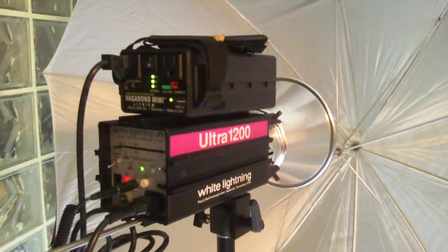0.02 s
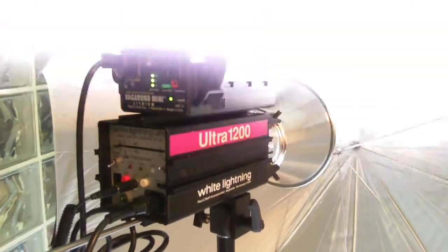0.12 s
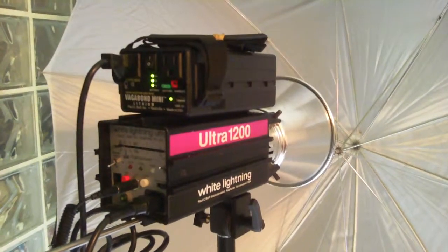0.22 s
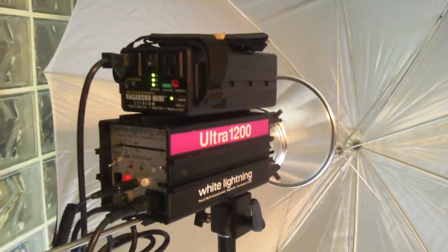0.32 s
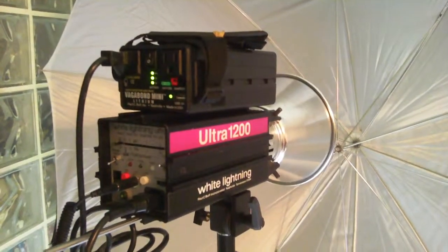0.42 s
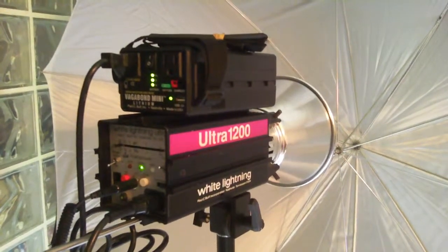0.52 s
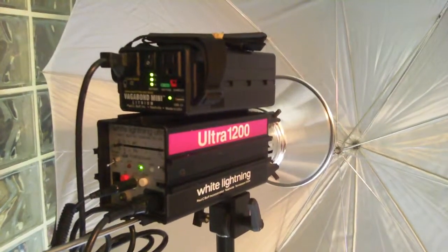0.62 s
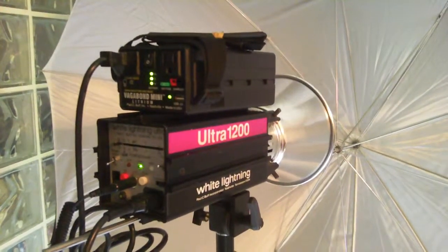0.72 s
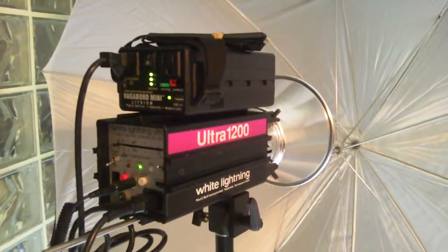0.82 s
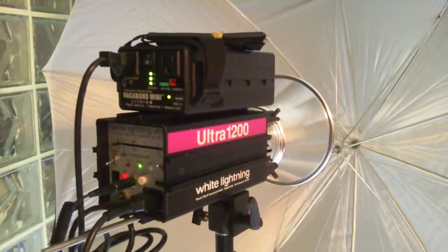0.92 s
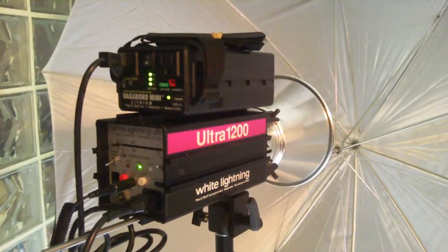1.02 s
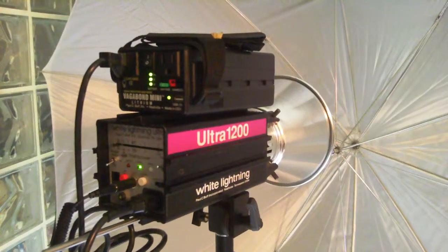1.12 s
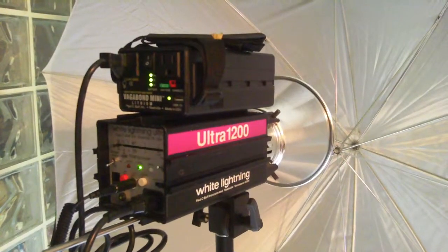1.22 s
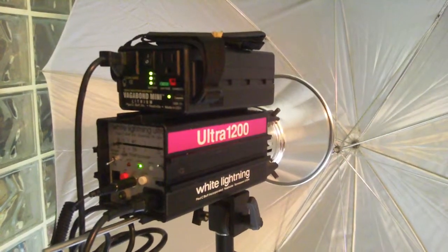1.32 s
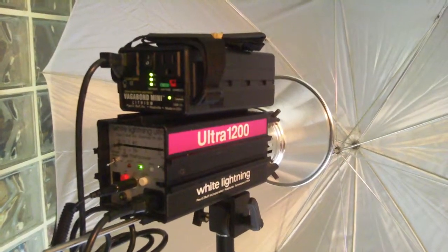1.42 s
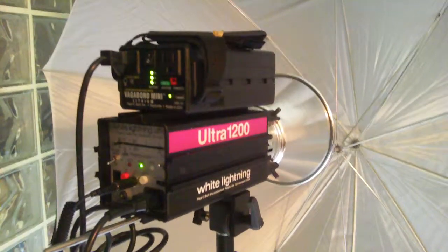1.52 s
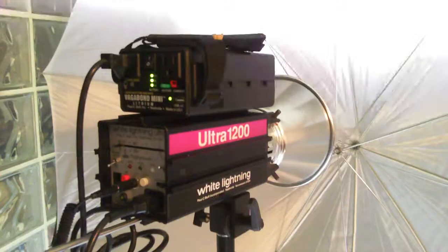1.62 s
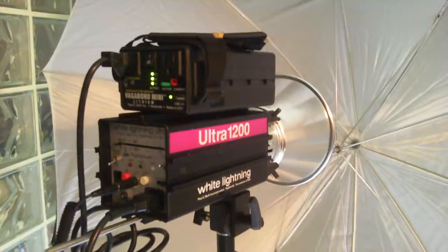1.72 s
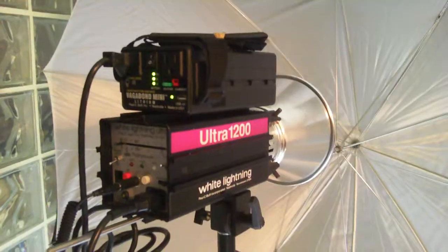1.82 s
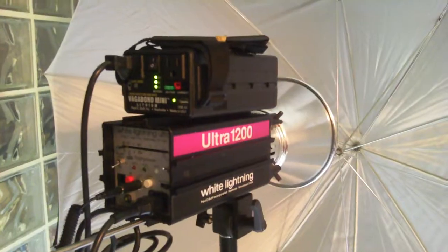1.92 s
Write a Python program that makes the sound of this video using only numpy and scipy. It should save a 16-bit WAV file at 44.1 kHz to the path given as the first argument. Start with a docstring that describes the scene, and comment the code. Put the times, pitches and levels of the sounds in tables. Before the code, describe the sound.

A studio flash fires twice with sharp, high clicks in a quiet room.

```python
"""In a small, quiet studio room, a flash head fires twice, close by.
Each firing is a light trigger tick, the sharp crack of the discharge and a quick rebound,
which make the flash tube and its metal housing shiver and ring.
A faint scuffing tick comes between the firings, and a soft tap follows the second.
The walls add a short echo; room air and mains hum lie beneath it all."""
import sys
import numpy as np
from scipy import signal
from scipy.fft import rfft, irfft
from scipy.io import wavfile
from scipy.ndimage import uniform_filter1d

SR = 44100
rng = np.random.default_rng(int(sys.argv[2]) if len(sys.argv) > 2 else 0)


def put_to_file(sound):
    """Save the sound as 16-bit audio at rate SR, in the file named by the first command-line argument."""
    columns = np.atleast_2d(sound).T  # one column per channel
    safe = np.clip(columns, -1, 1)
    whole_steps = np.round(safe * 32767)
    wavfile.write(sys.argv[1], SR, whole_steps.astype(np.int16))


N = 88200  # two seconds

# A "colour" says how strong the low and high frequencies are compared with each other.
# colour of the room air (frequency [Hz], level [dB])
AIR_COLOUR = [(15, -47), (25, -20.5), (54, -7), (81, -11.5), (112, -4), (146, -12.5), (186, -2),
              (373, -2.5), (543, -4.5), (691, -5.5), (1120, -8), (1280, -11), (1630, -11.5), (7680, -18.5),
              (15000, -17)]
# colour of the echo from the walls (frequency [Hz], level [dB])
ECHO_COLOUR = [(500, -1), (2000, 9.5), (6000, 3), (10000, -4), (15000, -6)]
# the three contacts of the scuff (time [s], level [dB])
SCUFF_CONTACTS = [(1.046, -51), (1.057, -49.5), (1.07, -52)]
# colour of the scuff (frequency [Hz], level [dB])
SCUFF_COLOUR = [(2500, -36), (4700, -7), (5700, -8), (6350, 3.5), (6900, 1.5), (7500, -10), (8300, -2),
                (10000, -9.5), (13000, -20)]
# the tap and its small bounces (time [s], level [dB])
TAP_CONTACTS = [(1.867, -46.5), (1.873, -51), (1.8763, -54), (1.8855, -57)]
# colour of the tap (frequency [Hz], level [dB])
TAP_COLOUR = [(1200, -37), (1900, -12), (2450, 0), (2900, -8), (3500, -19), (4400, -24), (5500, -10),
              (6300, -19), (12000, -34)]
# ringing tones of the tube and housing (frequency [Hz], level [dB], time to fade by 60 dB [s])
RING_TONES = [(967, -48.5, 0.044), (1125, -56, 0.2), (2130, -51, 0.14), (4276, -48.5, 0.07),
              (6700, -41.5, 0.076), (7210, -40.5, 0.093), (8360, -48, 0.15), (8545, -47, 0.09),
              (9238, -21.5, 0.073), (10170, -31, 0.068), (10180, -34, 0.11), (10950, -29.5, 0.068),
              (11540, -39, 0.067), (13060, -31, 0.095)]
# colour of the shivering housing (frequency [Hz], level [dB])
SHIVER_COLOUR = [(250, -48), (600, -26), (1100, -16.5), (2200, -16), (3600, -21.5), (5200, -18), (7000, -5),
                 (8200, -11), (10200, -4), (11200, 0), (12400, 0), (13300, -2), (14100, 2), (15200, -13.5)]
# colour of the trigger tick (frequency [Hz], level [dB])
TRIGGER_COLOUR = [(600, -45), (1600, -27), (2200, -22.5), (3000, -27), (6000, -19), (8200, -27),
                  (9300, -16), (10900, 2.5), (12400, 4), (13300, -11), (15000, -10)]
# colour of the crack and its rebound (frequency [Hz], level [dB])
CRACK_COLOUR = [(250, -66), (800, -52), (1500, -27), (2200, -30), (2900, -20.5), (3650, -28), (4350, -17.5),
                (5100, -28.5), (6100, -15.5), (8200, -18.5), (9500, -4), (10700, -1), (12300, -2.5),
                (13300, 7.5), (14100, -4), (15200, -15)]
# the two firings (time [s], level [dB])
FIRINGS = [(0.2034, -1.2), (1.6961, 0)]

CRACK_DELAY_S, REBOUND_DELAY_S = 0.0026, 0.0043  # both counted from the trigger tick


def gain(db):
    """Turn decibels into a number to multiply a sound by."""
    return 10 ** (np.asarray(db) / 20)


def colour(sound, points):
    """Give a sound a colour; plain white noise would keep its overall power."""
    size = 4096
    hz, db = np.array(points, float).T
    freqs = np.maximum(np.fft.rfftfreq(size, 1 / SR), 1)
    curve = gain(np.interp(np.log(freqs), np.log(hz), db))
    curve /= np.sqrt(np.mean(curve ** 2))
    # build the filter so that nothing sounds before the hit that causes it
    cepstrum = irfft(np.log(curve))
    cepstrum[1:size // 2] *= 2
    cepstrum[size // 2 + 1:] = 0
    click_response = irfft(np.exp(rfft(cepstrum)))
    return signal.fftconvolve(sound, click_response)[:N]


def strike(start, rise_s, fade_s):
    """The loudness shape of a hit: a quick rise, then a fall of 60 dB every fade_s seconds."""
    age = np.maximum(np.arange(N) / SR - start, 0)
    return (1 - np.exp(-age / rise_s)) * np.exp(-np.log(1000) * age / fade_s)


def grit():
    """Noise made of tiny equal pulses, each pointing up or down at random."""
    return np.sign(rng.standard_normal(N))


def snap(start, fade_s):
    """A very short burst that holds every frequency about equally."""
    shape = strike(start, rise_s=0.00034, fade_s=fade_s)
    burst = shape * grit()
    for _ in range(4):  # even out the frequencies, then put the loudness shape back
        flat = irfft(np.exp(1j * np.angle(rfft(burst))), N)
        loudness = np.sqrt(np.abs(uniform_filter1d(flat ** 2, size=32)) + 1e-18)
        burst = shape * flat / loudness
    return burst


def room_air():
    """Steady room air and hiss, with a faint mains hum."""
    hum_hz = 120.3
    hum = np.sqrt(2) * np.sin(2 * np.pi * hum_hz * np.arange(N) / SR)
    air = colour(rng.standard_normal(N), AIR_COLOUR)
    return gain(-57) * air + gain(-76) * hum


def wall_echo(sound):
    """Many reflections from the studio walls blur into one short echo."""
    tail = strike(start=0.014, rise_s=0.0079, fade_s=0.31) * rng.standard_normal(N)
    tail /= np.sqrt(np.sum(tail ** 2))
    echo = signal.fftconvolve(sound, tail)[:N]
    return gain(-14.5) * colour(echo, ECHO_COLOUR)


def scuff():
    """Three light contacts run together into one faint tick."""
    contacts = sum(gain(db) * strike(start, rise_s=0.0011, fade_s=0.092) * grit()
                   for start, db in SCUFF_CONTACTS)
    return colour(contacts, SCUFF_COLOUR)


def tap():
    """A soft, duller tap that bounces a little."""
    contacts = sum(gain(db) * snap(start, fade_s=0.013) for start, db in TAP_CONTACTS)
    return colour(contacts, TAP_COLOUR)


def housing_ring(start):
    """The crack sets the tube and housing ringing; each tone fades at its own speed."""
    age = np.arange(N) / SR - start
    ring = np.zeros(N)
    for hz, db, fade_s in RING_TONES:
        tone = np.sin(2 * np.pi * (hz * age + rng.random()))
        ring += gain(db) * strike(start, rise_s=0.0024, fade_s=fade_s) * tone
    return ring


def flash(start):
    """One firing: the trigger ticks, the discharge cracks and rebounds, and the housing shivers."""
    crack_start = start + CRACK_DELAY_S
    trigger = gain(-16.5) * snap(start, fade_s=0.016)
    crack = gain(-6) * snap(crack_start, fade_s=0.007)
    rebound = gain(-11) * snap(start + REBOUND_DELAY_S, fade_s=0.00264)
    shiver = gain(-23) * strike(crack_start, rise_s=0.0028, fade_s=0.056) * grit()
    return (colour(trigger, TRIGGER_COLOUR)
            + colour(crack + rebound, CRACK_COLOUR)
            + colour(shiver, SHIVER_COLOUR))


def scene():
    """Add up all the sounds in the room, the same for both ears."""
    flashes = sum(gain(db) * flash(start) for start, db in FIRINGS)
    clicks = flashes + scuff() + tap()
    rings = sum(gain(db) * housing_ring(start + CRACK_DELAY_S) for start, db in FIRINGS)
    echo = wall_echo(clicks + gain(-4.5) * rings)  # the ringing gets less echo than the clicks
    mix = clicks + rings + echo + room_air()
    return np.array([mix, mix])


def record(dry):
    """The camera turns down one narrow band of the treble and cuts off the very highest sounds."""
    dip_hz, dip_width_hz, dip_depth = 7800, 130, 0.73
    top_hz = 15350
    band_removed = signal.lfilter(*signal.iirnotch(dip_hz, dip_hz / dip_width_hz, fs=SR), dry)
    dipped = dry + dip_depth * (band_removed - dry)
    top_cut = signal.ellip(10, 0.2, 80, top_hz, fs=SR, output="sos")
    return signal.sosfilt(top_cut, dipped)


dry = scene()
out = record(dry)
put_to_file(out)
```